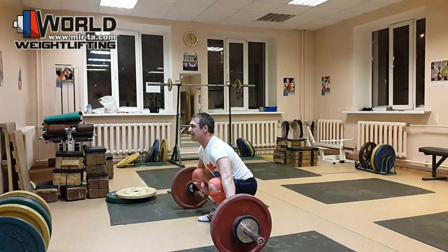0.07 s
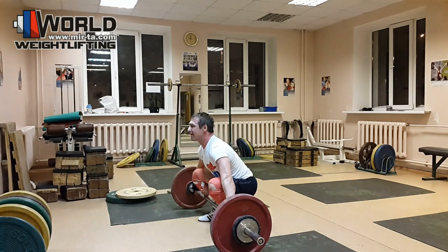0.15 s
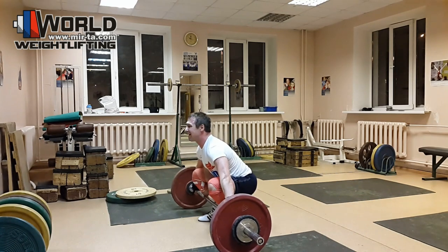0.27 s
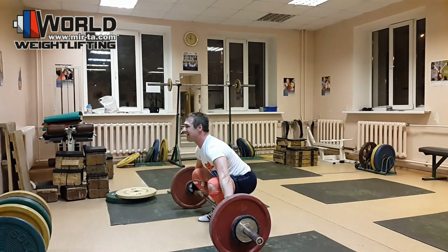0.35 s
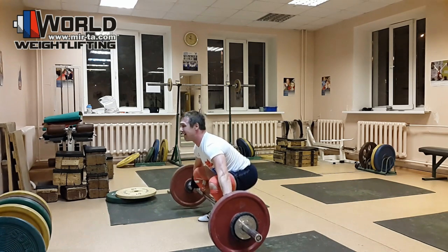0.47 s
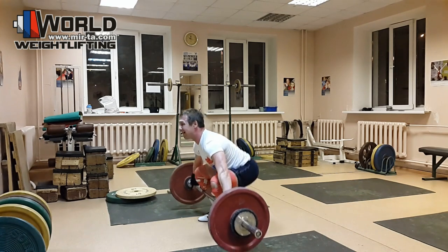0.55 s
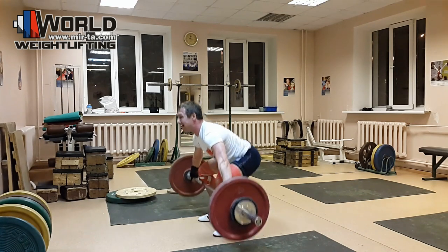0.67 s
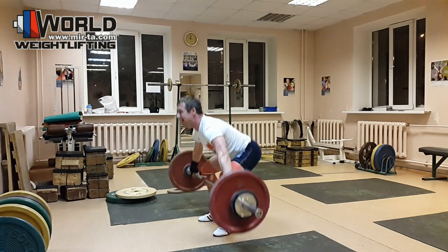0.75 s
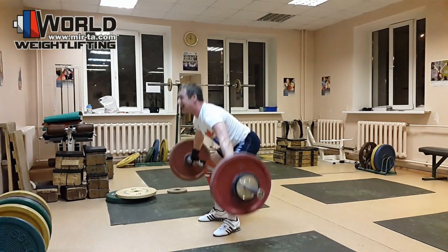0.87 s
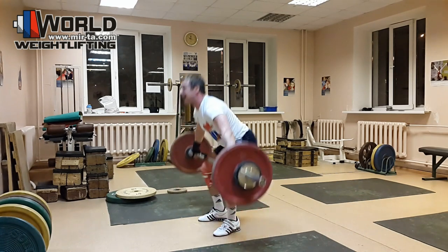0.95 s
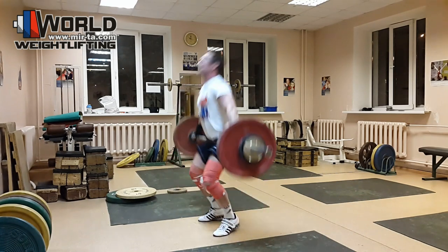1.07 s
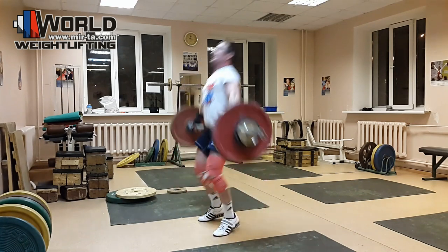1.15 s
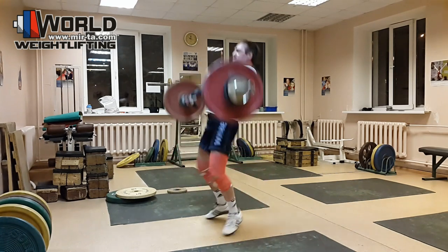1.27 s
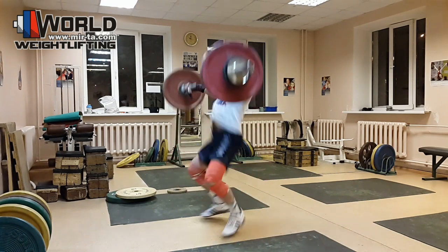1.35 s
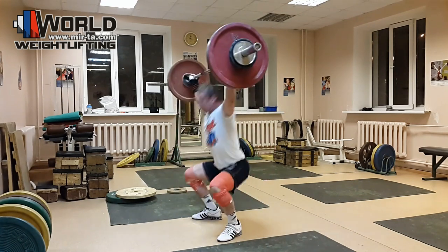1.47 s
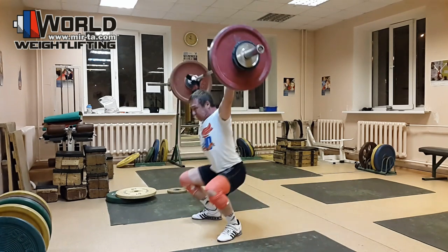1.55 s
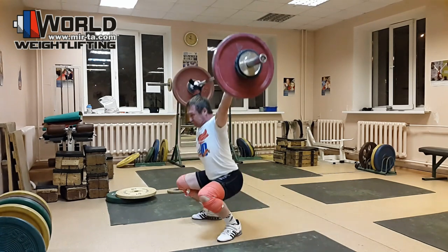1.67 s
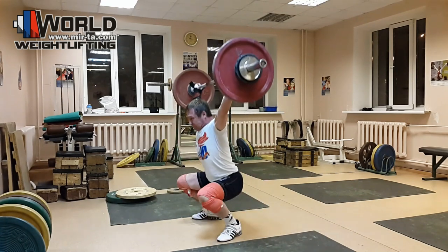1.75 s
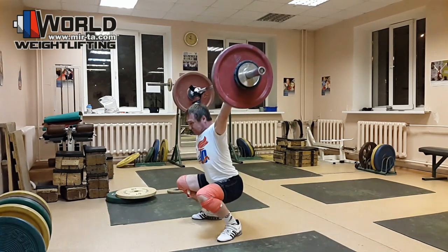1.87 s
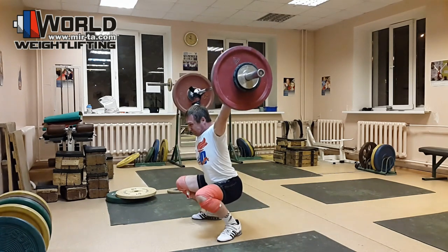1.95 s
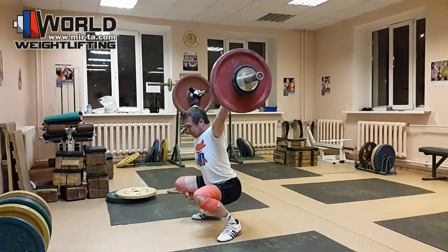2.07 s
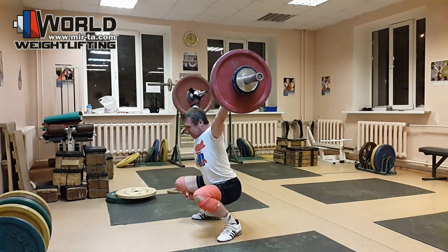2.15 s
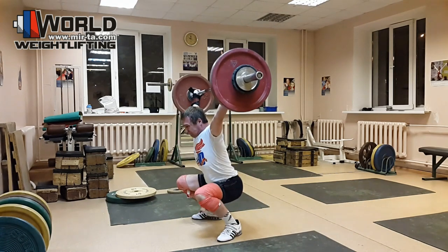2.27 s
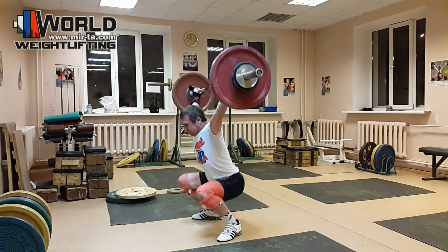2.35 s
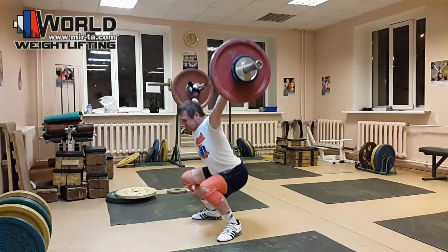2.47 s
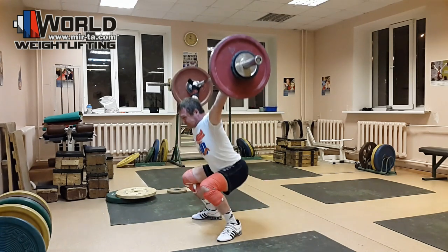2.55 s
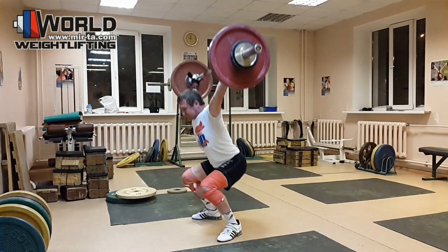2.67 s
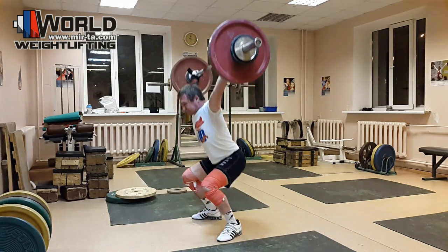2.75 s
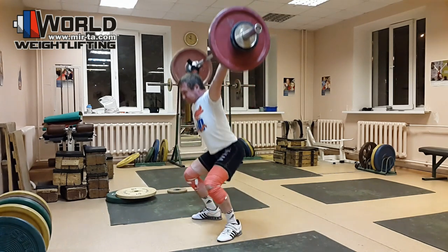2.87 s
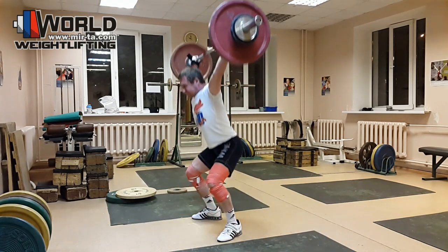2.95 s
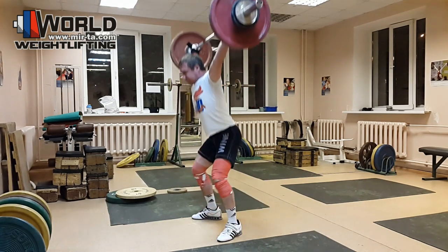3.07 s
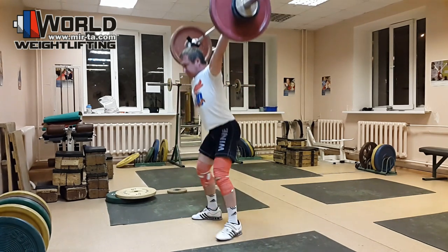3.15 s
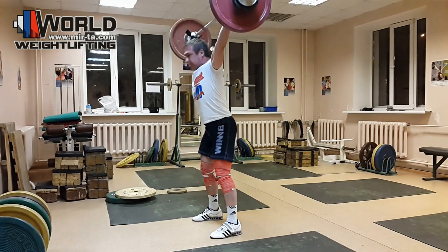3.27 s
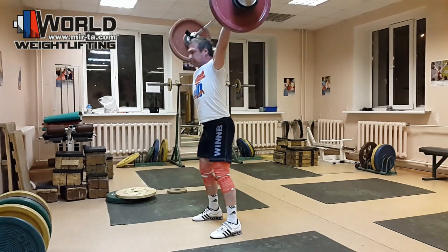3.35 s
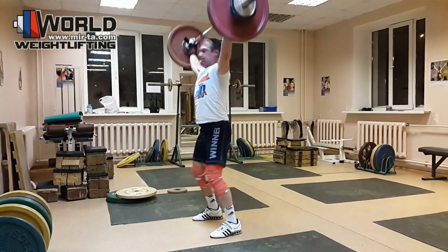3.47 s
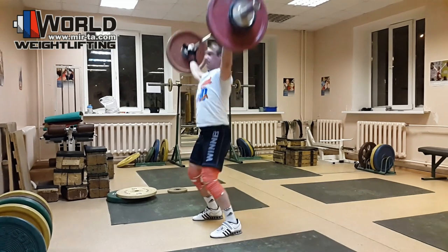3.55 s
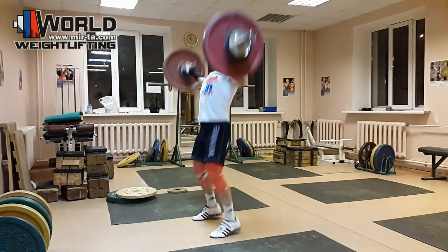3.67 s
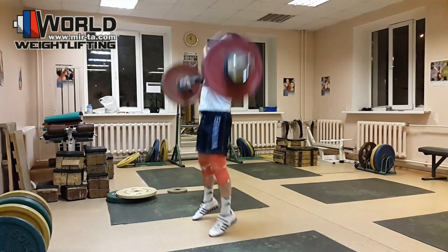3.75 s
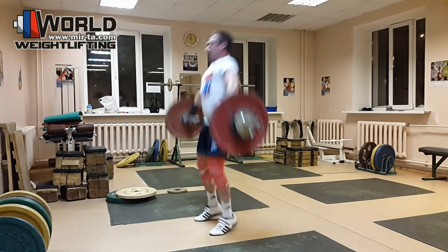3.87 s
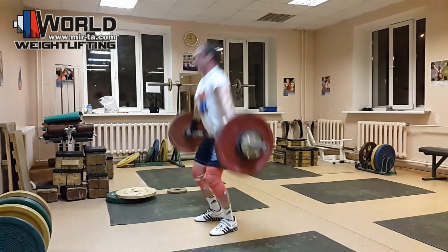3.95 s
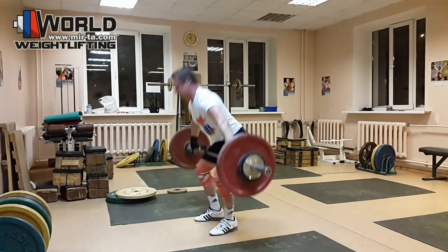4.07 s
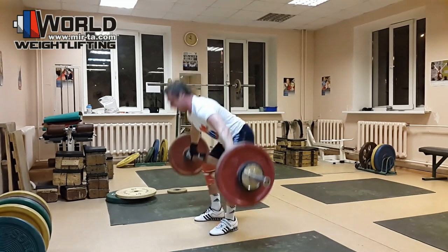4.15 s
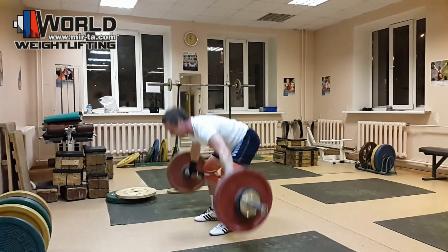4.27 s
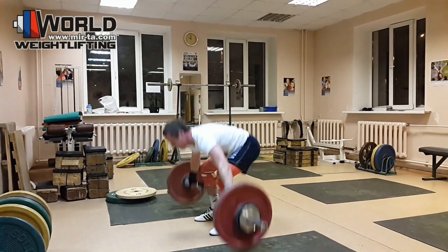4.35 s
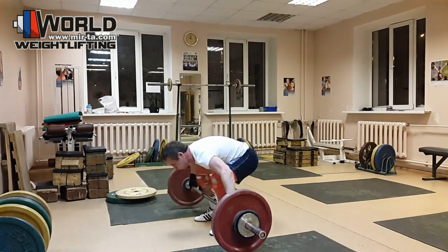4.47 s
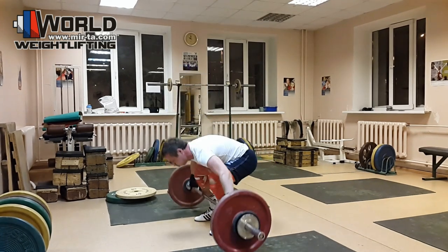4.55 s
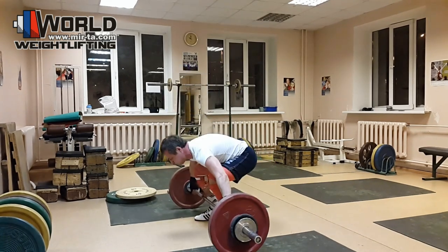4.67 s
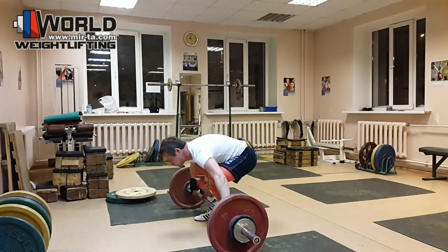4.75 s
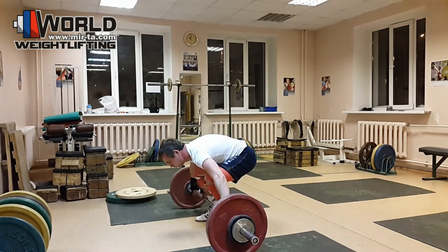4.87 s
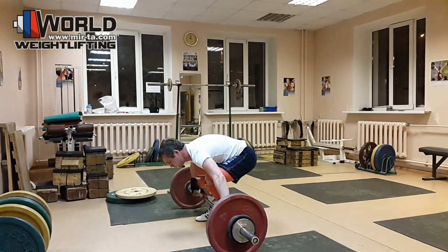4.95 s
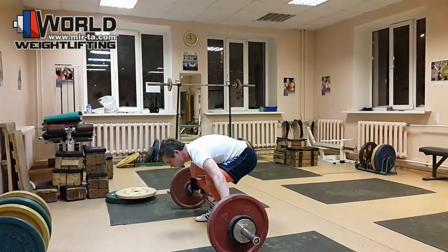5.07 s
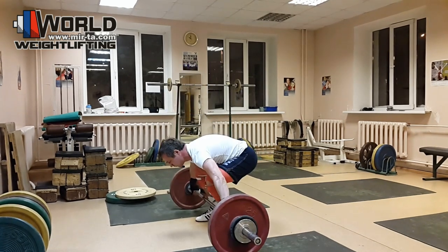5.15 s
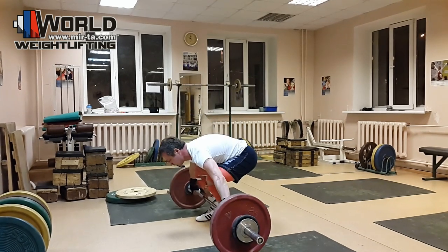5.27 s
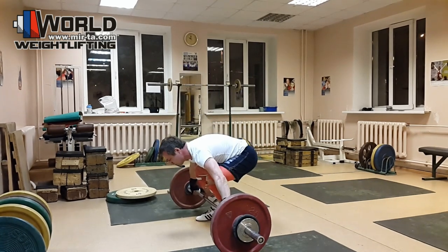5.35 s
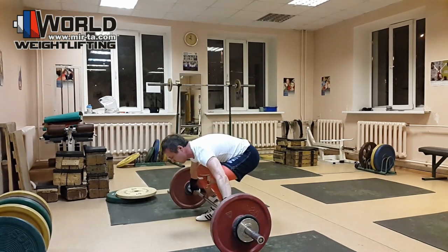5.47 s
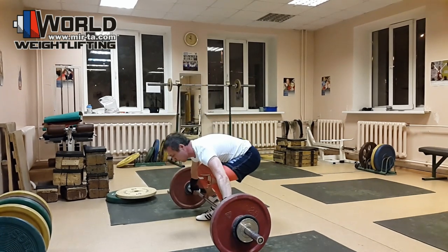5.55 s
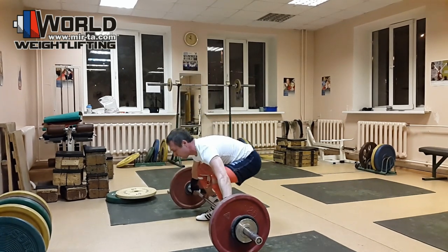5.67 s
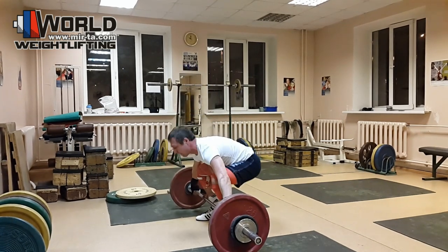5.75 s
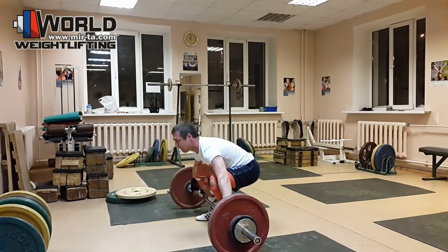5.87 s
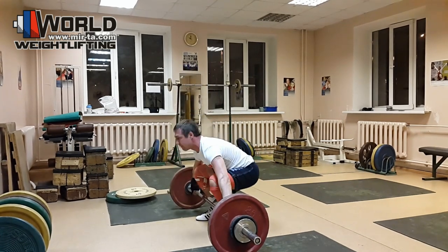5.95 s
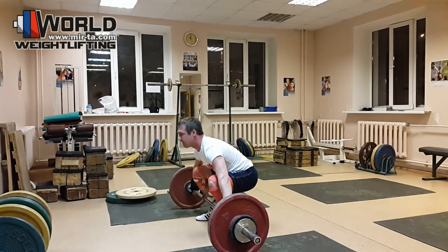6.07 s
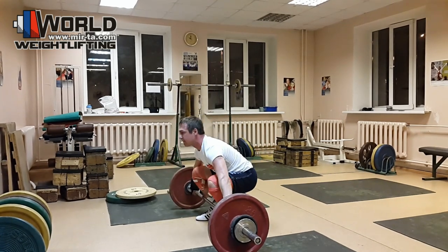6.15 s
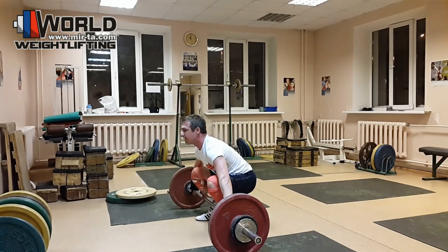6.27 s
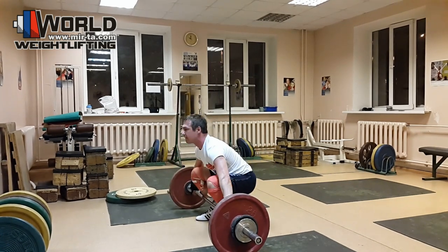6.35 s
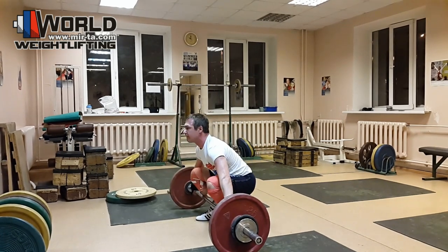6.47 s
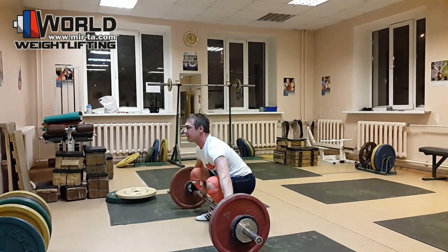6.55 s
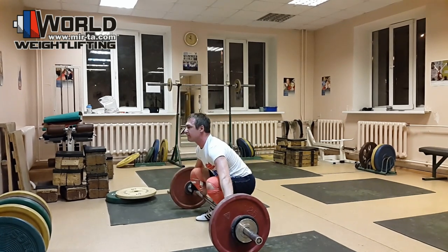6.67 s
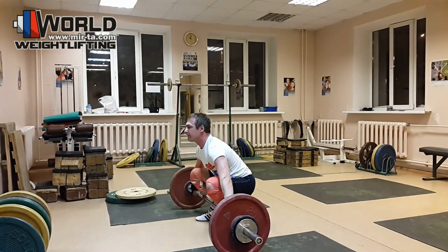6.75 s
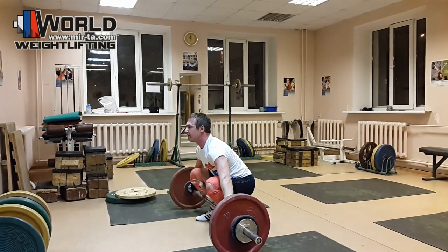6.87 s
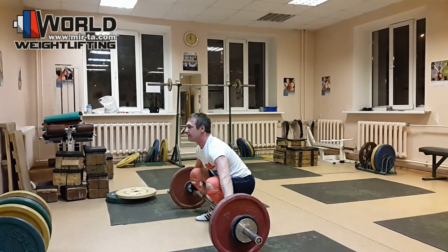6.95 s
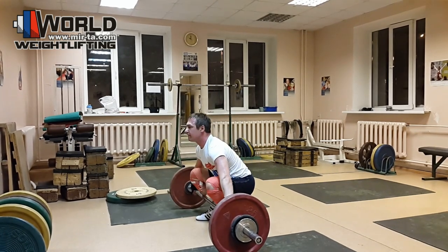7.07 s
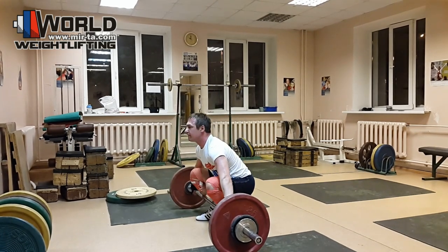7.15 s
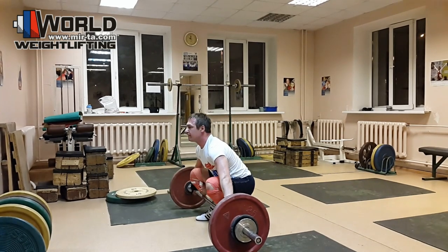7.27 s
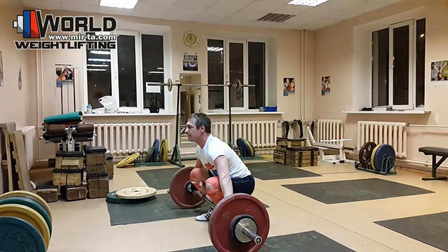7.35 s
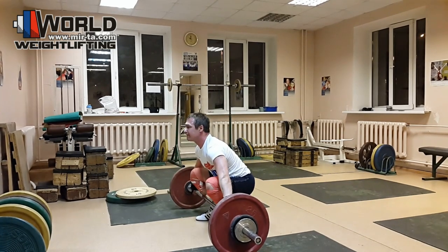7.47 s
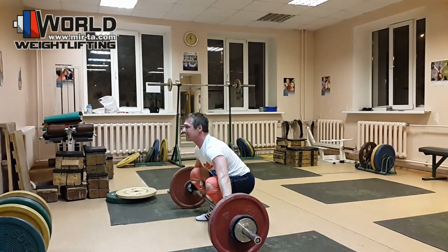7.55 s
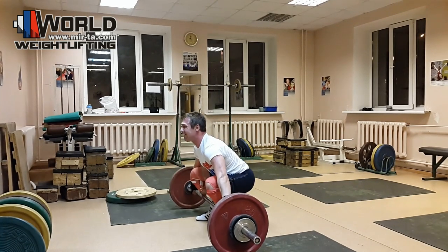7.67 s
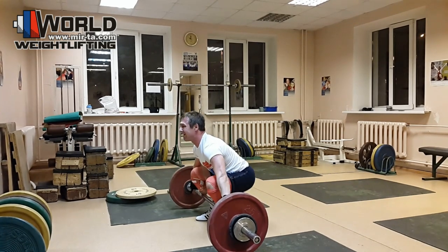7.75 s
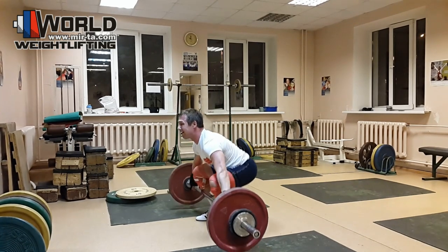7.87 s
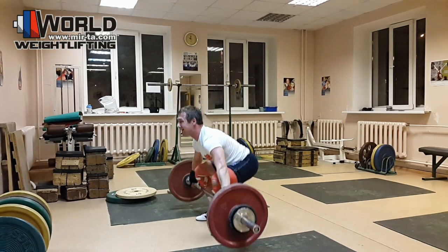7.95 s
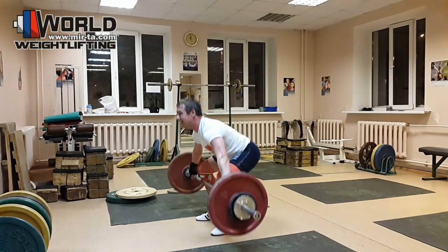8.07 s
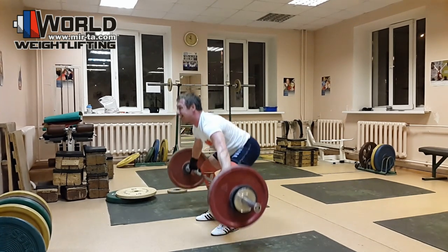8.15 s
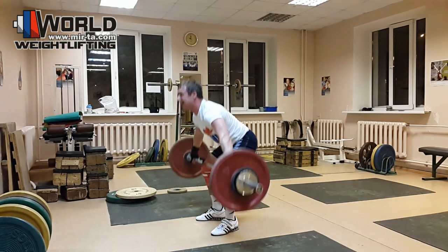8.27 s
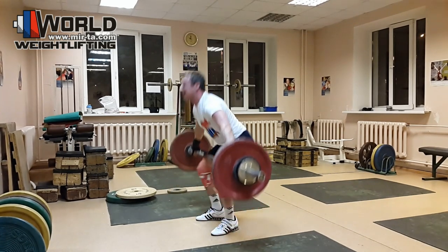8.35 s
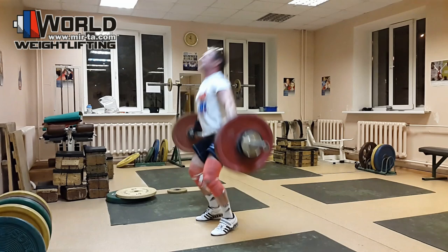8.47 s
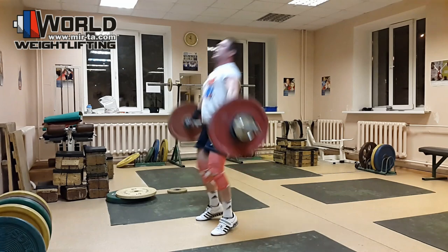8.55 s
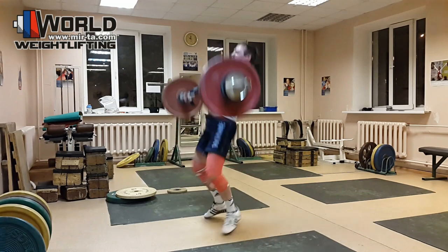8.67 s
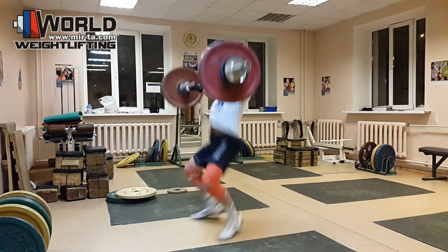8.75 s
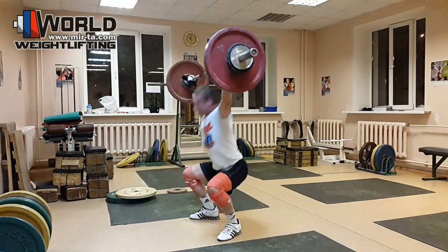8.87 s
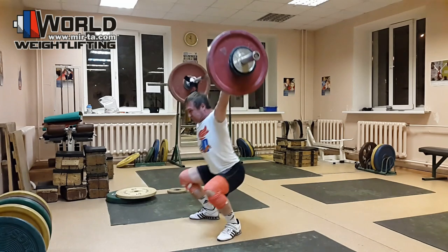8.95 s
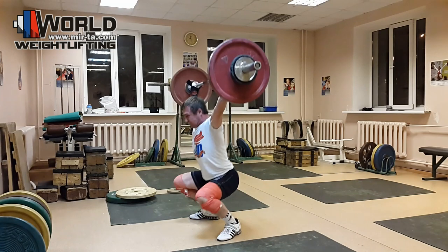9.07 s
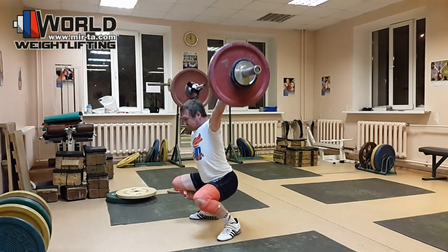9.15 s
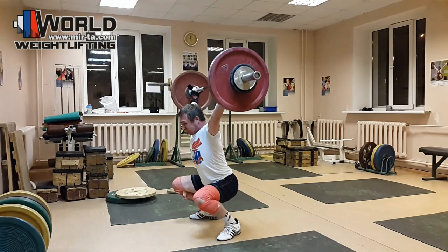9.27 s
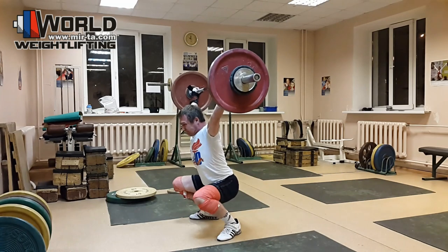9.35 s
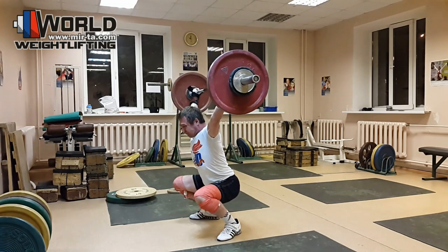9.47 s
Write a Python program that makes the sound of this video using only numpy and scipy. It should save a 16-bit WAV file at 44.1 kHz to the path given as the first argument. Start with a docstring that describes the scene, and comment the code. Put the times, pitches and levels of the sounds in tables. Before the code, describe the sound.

In a hard-walled gym, loose plates clatter as a barbell is snatched, feet slam the floor, the bar crashes down, then it repeats.

```python
"""A hard-walled gym: a lifter snatches a loaded barbell, lowers it to the platform and snatches again.
Loose plates clatter on steel sleeves: impulses excite short hub modes, and long decaying tones ring in the steel.
Shoes and rubber rims thud on the wooden floor as damped tones and filtered noise; its low modes boom and beat.
The contacts excite a diffuse tail, over a low rumble and a narrow band of microphone hiss of shaped noise."""
import sys
import numpy as np
from scipy import signal
from scipy.fft import rfft, irfft
from scipy.io import wavfile
from scipy.ndimage import uniform_filter1d

SR = 44100
rng = np.random.default_rng(int(sys.argv[2]) if len(sys.argv) > 2 else 0)


def to_wav(s):
    """Save 16-bit WAV."""
    ch = np.atleast_2d(s).T  # columns
    pcm = np.round(np.clip(ch, -1, 1) * 32767)  # PCM
    wavfile.write(sys.argv[1], SR, pcm.astype(np.int16))


N = 419391  # samples

# Rumble spectrum. Each row: frequency in Hz, relative spectral level in dB.
RUMBLE_SPECTRUM = [(15, -59.5), (25, -27), (64, -15), (98, -6.5), (124, -13), (345, -22), (413, -19),
                   (525, -28.5), (1320, -37.5), (1710, -35.5), (3000, -51.5), (3900, -83), (6600, -120)]
# Microphone hiss spectrum. Each row: frequency in Hz, relative spectral level in dB.
HISS_SPECTRUM = [(1880, -58.5), (3200, -27.5), (3710, -14), (3940, -2.5), (4130, 2.5), (5370, -12),
                 (6270, -32.5), (10900, -32), (14000, -33), (15200, -23), (16000, -27.5)]
# Movement of the lifter that stirs the rumble. Each row: time in seconds, added level in dB.
STIR = [(0, 0.5), (0.598, 9.5), (1.1, 5.5), (3.101, 6), (3.45, 9.5), (3.799, 10), (5.6, 12), (6.3, 1),
        (7.4, -1), (7.999, 4), (8.5, 4.5), (9.51, 8.5)]
# Balance of the background noise. Each row: frequency in Hz, left over right in dB.
NOISE_LEAN = [(60, -4.5), (180, 1), (550, -6), (1650, 1), (4970, -23.5), (15000, 11)]
# Floor and room modes. Each row: frequency in Hz, relative level in dB, decay time T60 in seconds.
BOOM_MODES = [(31.2, -9, .8), (45.7, 0, 1.75), (54.7, -6, 1.9), (64.9, -3, 1.8), (73.4, -5, .75),
              (86, -7, 1.0), (95.3, -7, 1.1), (110, -9, .9)]
# Full weight landing on the boards. Each row: time in seconds, boom excitation in dB.
LANDINGS = [(0.638, -66), (1.568, -15), (3.43, -55), (4.029, -42), (4.128, -35.5), (4.572, -31),
            (4.782, -35), (5.583, -62.5), (7.904, -70), (8.062, -67.5), (8.663, -61), (8.975, -13.5)]
# Shoes and rubber rims on the floor.
# Each row: start in seconds, thud level in dB, pitch in Hz, level of the boards' shudder in dB.
THUDS = [(0.263, -45, 440, -77.5), (0.609, -73.5, 233, -48), (1.17, -53, 156, -53.5),
         (1.201, -47, 342, -47.5), (1.238, -43.5, 358, -45), (1.284, -20.5, 455, -49),
         (1.455, -22, 458, -42), (1.568, -6, 453, -18), (1.594, -9, 343, -21), (1.619, -14.5, 133, -21),
         (1.658, -30.5, 92, -14.5), (3.429, -48, 93, -52.5), (3.857, -32.5, 426, -61),
         (3.985, -34, 482, -43.5), (4.03, -34.5, 420, -45.5), (4.126, -33, 150, -29),
         (4.225, -15.5, 412, -50), (4.572, -17.5, 345, -32), (4.629, -22, 450, -28),
         (4.778, -24, 222, -38.5), (5.149, -41.5, 171, -38.5), (5.585, -47, 141.1, -56),
         (7.618, -55.5, 356.4, -70), (7.904, -44, 358, -59), (8.06, -45, 333.4, -44.5),
         (8.429, -53.5, 149, -61.5), (8.577, -48.5, 195.5, -51.5), (8.62, -36.5, 443, -56.5),
         (8.662, -17.5, 455, -60.5), (8.714, -30, 414, -53.5), (8.862, -22.5, 450, -52),
         (8.948, -9.5, 376, -7), (8.98, -23.5, 148, -12), (9.029, -31.5, 283, -14.5), (9.07, -48, 92, -20),
         (9.14, -40, 137, -28)]
# Reverberation of the room. Each row: band centre in Hz, decay time T60 in seconds.
ROOM_DECAY = [(80, 0.11), (200, 0.86), (500, 0.74), (1200, 0.72), (3000, 0.73), (7000, 0.74), (14000, 0.56)]
# Left-right likeness of the diffuse tail. Each row: frequency in Hz, likeness from 0 to 1.
TAIL_LIKENESS = [(60, 0.92), (180, 0.95), (550, 0.77), (1650, 0.3), (4970, 0.1), (15000, .1)]
# Balance of the bar and plates. Each row: frequency in Hz, left over right in dB.
BAR_LEAN = [(60, 2), (150, 0.5), (380, -5.5), (950, -12.5), (2380, -7.5), (5980, -12.5), (9000, 4),
            (15000, 1.5)]
# Jolts that shake the plates loose on the sleeves.
# Each row: start in seconds, length in seconds, shake level at the start in dB, shake level at the end in dB.
JOLTS = [(1.163, 0.096, -63.5, -54.5), (1.283, 0.13, -27, -16), (1.559, 0.13, -22, -23),
         (3.314, 0.088, -78.5, -62), (3.416, 0.28, -63, -75), (3.873, 0.19, -30, -45.5),
         (4.13, 0.087, -37, -36.5), (4.222, .17, -38, -43), (4.564, 0.1, -21, -15),
         (4.776, .14, -17.5, -17.5), (8.569, 0.071, -62, -48.5), (8.665, .13, -21, -17.5),
         (8.825, .07, -18, -23.5), (8.949, 0.13, -29, -24.5)]
# The whole stack slapping together as the bar stops short. Each row: time in seconds, shake level in dB.
SLAPS = [(1.567, -7.5), (4.128, -33), (4.228, -29), (8.948, -6)]
# Spectrum of the plates' contact noise. Each row: frequency in Hz, relative spectral level in dB.
CLATTER_SPECTRUM = [(88, -47.5), (150, -17), (475, -5), (1420, 0.5), (2060, -5), (2400, -1), (3840, -7.5),
                    (4160, -11), (4410, -4), (5910, -18.5), (9080, -76.5), (9630, -25), (10800, -55.5),
                    (12400, -28), (16000, -38.5)]
# Short modes of the plate hubs. Each row: frequency in Hz, relative level in dB, decay time T60 in seconds.
HUB_MODES = [(455, -2, 0.033), (760, -13, 0.024), (993, -7.5, 0.015), (1310, -0.5, 0.017), (1550, -4, 0.03),
             (1860.5, 0, 0.034), (2060, 0.5, 0.031), (2243, -4, 0.036), (3004, -11.5, 0.029),
             (3350, -16, 0.064), (4670, -16, 0.017)]
# Ringing tones of bar and sleeves, one list a family, upward in pitch;
# in the last list also clusters of high shimmer.
# Each row: frequency in Hz, relative level in dB, decay time T60 in seconds.
STEEL_FAMILIES = [
    [(1753, -8, 1.4), (1761, -3, 1.8), (1773, -12.5, 1.8)],
    [(2980, -6, 0.15), (3093, -6.5, .2)],
    [(4072, 4.5, 0.22), (4190, -10, 0.16)],
    [(5780, 0, 0.9), (6916, -9, 0.51), (7540, -24.5, 0.13), (7840, -25.5, .2)],
    [(9760, -3, 0.25), (9900, 2, 0.16), (10410, -13.5, 0.72), (11480, -14.5, 0.63), (13200, -10, 0.17),
     (13000, -8, .2), (12200, -9.5, .15), (14010, -3.5, .2), (14830, 0.5, .27), (14930, -2, .15),
     (15120, 0.5, .2), (15400, -2.5, .15)],
]
# Offset of each steel family's ring. Each entry: added level in dB.
FAMILY_DB = [0.21, 2.8, 2, -1.1, -1.7]
# The hands tighten on the bar and still its ring. Each entry: time in seconds.
GRIPS = [2.37, 6.04]
# Plate and sleeve knocks, and moments when the steel's ring swells or sinks to a new level.
# Each row: start in seconds, knock level in dB, pitch in Hz,
# base level of the steel's ring in dB, dullness in dB lost a family upward,
# place of the emphasis (0 bar, 1 collar, 2 sleeve, 3 sleeve end).
KNOCKS = [(0.265, -50, 2110, -74.5, 7, 2.1), (0.992, -62, 3950, -90, 4, 3.4),
          (1.249, -42, 2130, -51, 8.3, 0.78), (1.284, -18.5, 647, -26, 13, 1.5),
          (1.31, -18, 2250, -36, 6.3, 1.4), (1.342, -14.5, 1827, -30, 3.4, .1),
          (1.364, -19, 2130, -36.5, 3.5, 2.4), (1.393, -14, 1550, -29.5, 3.9, .1),
          (1.409, -29, 2080, -34, 5.1, 2.24), (1.459, -25.5, 2060, -48, 2.2, 1.1),
          (1.499, -30.5, 2190, -42.5, 4.3, .1), (1.54, -21.5, 2080, -48, 5.6, 1.1),
          (1.57, -11, 610, -33, 12, 1.1), (1.591, -12, 590, -54, 6, .9), (1.654, -28, 646, -36, 3.4, 2.46),
          (1.749, -22.5, 1756, -39, 9.3, 1.6), (1.984, -37.5, 1550, -64, 9.5, .1),
          (2.2, -58.5, 1743, -69, 13, 0.11), (3.378, -60, 1050, -90, 4, 0.57),
          (3.433, -54, 603, -90, 3.7, 1.6), (3.497, -59, 1496, -90, 4, 0.57),
          (3.868, -28.5, 1076, -39, 11.5, 1.7), (3.888, -25, 1460, -46, 9.9, 1.8),
          (4.036, -25, 670, -55, 12, 1.9), (4.128, -13.5, 2150, -33, 6.4, 2.6),
          (4.151, -25.5, 2050, -40, 3.7, 1.8), (4.226, -16, 757, -42, 5.3, 3.34),
          (4.289, -22, 575, -40, 9.8, 2.2), (4.333, -24.5, 896, -40.5, 10.5, 2.4),
          (4.573, -16.5, 1710, -27, 6.7, 2.1), (4.582, -8, 2310, -38, 4.5, 1.1),
          (4.609, -10, 1334, -30.5, 2.9, 1.1), (4.645, -9, 2060, -23, 4.2, 1.27),
          (4.666, -7, 1817, -29, 3, .1), (4.698, -14.5, 2060, -32.5, 1.5, 1.5),
          (4.73, -14, 1740, -31, 0.46, 1.4), (4.784, -13.5, 1930, -28, 2.6, 1),
          (4.834, -13.5, 2060, -33, 0.72, 1.75), (4.859, -13.5, 1980, -32, 2.1, 1.1),
          (4.895, -16, 1310, -32.5, 1.4, 1.3), (4.939, -22.5, 2060, -38.5, 1.85, 3.04),
          (4.988, -21, 1730, -44, 1.5, 3.4), (5.119, -48, 1800, -53.5, 7.7, 0.11),
          (5.246, -57.5, 1766, -52.5, 11, 0.12), (5.951, -60.5, 1760, -71.5, 12, .1),
          (8.064, -59.5, 708, -88, 3.3, 2), (8.626, -32, 700, -65, 10, 2),
          (8.665, -14.5, 674, -38, 7.1, .8), (8.698, -17.5, 1980, -30, 4.5, 1.75),
          (8.717, -17.5, 1940, -33.5, 3.4, 1), (8.751, -17, 1700, -32, 3.1, 1.8),
          (8.779, -10.5, 1850, -30, 0.66, 1.25), (8.802, -22, 1520, -30, 0.29, 1.65),
          (8.837, -27, 1830, -37.5, 0.27, 0.11), (8.868, -17, 1690, -29.5, 2, 0.79),
          (8.898, -25, 1820, -38, 2.7, 0.63), (8.948, -9.5, 720, -38, 12, 1.5),
          (9.068, -19.5, 1760, -33.5, 7.5, 0.86), (9.169, -27.5, 1920, -42, 6.6, 0.85),
          (9.293, -32.5, 1770, -49, 5.6, 1.5), (9.471, -39, 576, -57.5, 5.1, 2.4)]

RUMBLE_DB, HISS_DB = -74, -70.5
BUILD_T60 = 0.14  # s, how fast the room fills with the boom
FLOOR_WET_DB = .5  # diffuse tail against direct sound for the blows on the floor
FEET_LAG = 15  # samples by which the left port hears the floor late
SLAP_S, SETTLE_DB_PER_S = 0.009, 217.5  # length of a slap; how fast the plates come to rest after a jolt
REBOUND_DB, REBOUND_S = -8.5, .011  # every row of KNOCKS adds a brief, dying rattle of the plates
TICKS_PER_S, GRIT_S = 700, 0.0039  # mean rate of ticks; decay constant of one tick's scrape
NEAR_DB, REACH = 9, 0.59  # the family at the given place rings louder; reach in families
GRIP_DB_PER_S = 92  # extra decay of the gripped bar
SOFT_HZ = 1000  # a row below this pitch sets the ring's level without turning its phase
KNOCK_SIDE_DB, KNOCK_SCATTER_DB = 1, 4.5  # mean left-right lean of the knocks and its spread
EDGE_HZ = 15900  # cutoff of the band limit


def amp(db):
    """A level in decibels is twenty times the logarithm of an amplitude ratio."""
    return 10 ** (np.asarray(db) / 20)


def evened(x):
    """Division by the root mean square gives a signal unit power."""
    return x / np.sqrt(np.mean(x ** 2) + 1e-20)


def read(points, hz):
    """A spectrum given at points is interpolated along logarithmic frequency."""
    f, value = np.transpose(points)
    return np.interp(np.log(hz + 1), np.log(f + 1), value)


def add(mix, s, sound):
    """Superposition: sounds add linearly, here from the given second onward."""
    part = mix[..., round(s * SR):][..., :sound.shape[-1]]
    part += sound[..., :part.shape[-1]]


def ring(blows, hz, t60):
    """Modal resonance: a complex pole answers every impulse with an exponentially dying sine."""
    pole = np.exp((2j * np.pi * hz - np.log(1000) / t60) / SR)
    return signal.lfilter([1], [1, -pole], blows).imag


def noise_pair(size, likeness, lean):
    """Partial coherence: mixing shared and independent noise spectra sets the likeness of the two ports."""
    hz = np.fft.rfftfreq(size, 1 / SR)
    a, b, c, d = rng.standard_normal((4, len(hz)))
    shared, separate = a + 1j * b, c + 1j * d
    like = np.clip(read(likeness, hz), 0, 1)
    spectra = np.array([shared, like * shared + np.sqrt(1 - like ** 2) * separate])
    return hz, spectra * amp(np.outer([.5, -.5], read(lean, hz)))


def colour(points):
    """Minimum phase: the Hilbert transform of log gain yields a causal filter, scaled to unit energy."""
    hz = abs(np.fft.fftfreq(4096, 1 / SR))
    log_gain = np.log(amp(np.maximum(read(points, hz), -100)))
    taps = np.fft.ifft(np.exp(np.conj(signal.hilbert(log_gain)))).real[:2048]
    return taps / np.linalg.norm(taps)


def burst(hz, cycles, noisy, crack):
    """Impact excitation: a heavily damped tone mixed with contact noise, scaled to peak 1."""
    turns = hz * np.arange(len(crack)) / SR
    tone = np.sin(2 * np.pi * turns) * np.exp(-turns / cycles) * -np.expm1(-turns / .3)
    blow = (1 - noisy) * tone + noisy * crack
    return blow / abs(blow).max()


def background():
    """Stationary noise shaped in frequency: steady hiss, and a rumble modulated in level by movement."""
    hz, spectra = noise_pair(N, [(50, 0.67), (300, 0.64), (1000, .4), (4000, 0.25)], NOISE_LEAN)
    rumble = irfft(spectra * amp(read(RUMBLE_SPECTRUM, hz)), N)
    hiss = irfft(spectra * amp(read(HISS_SPECTRUM, hz)), N)
    stir_db = np.interp(np.arange(N) / SR, *np.transpose(STIR))
    rumble = amp(RUMBLE_DB + stir_db) * rumble / np.std(rumble.mean(0))
    return rumble + amp(HISS_DB) * hiss / np.std(hiss.mean(0))


def room(x, wet_db):
    """Reverberation: direct sound, then a diffuse tail whose bands decay at their own rates."""
    size = 2 * SR
    hz, spectra = noise_pair(size, TAIL_LIKENESS, [(1, 0.0077), (2, 0.00086)])
    t, tail = np.arange(size) / SR, 0
    for k, (_, t60) in enumerate(ROOM_DECAY):
        # each band is full at its own centre and fades to nothing at its neighbours'
        band = read([(f, float(j == k)) for j, (f, _) in enumerate(ROOM_DECAY)], hz)
        tail = tail + irfft(spectra * band, size) * amp(-60 * t / t60)
    tail *= np.clip((t - .004) / 0.011, 0, 1)  # silent for 4 ms, then rising over 11 ms
    tail /= np.linalg.norm(tail[0])
    return x + amp(wet_db) * signal.fftconvolve(x, tail, axes=1)[:, :N]


def boom():
    """Modal superposition: floor modes start together, build up as the room fills, and beat."""
    weight = np.zeros(N)
    for s, db in LANDINGS:
        weight[round(s * SR)] = amp(db)
    modes = sum(amp(db) * (ring(weight, hz, t60) - ring(weight, hz, BUILD_T60)) for hz, db, t60 in BOOM_MODES)
    return uniform_filter1d(modes, size=150)  # a soft sole: the blow lasts some milliseconds


def thuds():
    """Soft impact: a long contact excites only low frequencies, a dull tone and a shudder of the boards."""
    out = np.zeros(N)
    grit = rng.standard_normal((len(THUDS), 4000)) * np.exp(-np.arange(4000) / (0.016 * SR))
    dull = signal.butter(2, [120, 650], "band", fs=SR)
    deep = signal.butter(2, [70, 320], "band", fs=SR)
    for (s, db, hz, shudder_db), g in zip(THUDS, grit):
        crack = evened(signal.lfilter(*dull, g)) / 5
        shudder = signal.lfilter(*deep, g)
        add(out, s, amp(db) * burst(hz, 2.7, 0.38, crack))
        add(out, s, amp(shudder_db) * shudder / abs(shudder).max())
    return out


def leaned(x):
    """Level difference: the two microphone ports hear the bar unequally, by frequency."""
    hz = np.fft.rfftfreq(N, 1 / SR)
    return irfft(rfft(x) * amp(np.outer([.5, -.5], read(BAR_LEAN, hz))), N)


def shaking():
    """Forced and free motion: each jolt drives the plates for its length, then their shaking decays."""
    t, out = np.arange(N) / SR, np.zeros(N)
    for s, length, start_db, end_db in JOLTS:
        held_db = np.interp(t, [s, s + length], [start_db, end_db])
        settled_db = SETTLE_DB_PER_S * np.maximum(t - s - length, 0)
        out = np.maximum(out, (t >= s) * amp(held_db - settled_db))
    for s, db in SLAPS:
        out = np.maximum(out, amp(db) * (t >= s) * (t < s + SLAP_S))
    for s, db, *_ in KNOCKS:
        add(out, s, amp(db + REBOUND_DB) * np.exp(-t[:SR // 5] / REBOUND_S))
    return uniform_filter1d(out, size=201, origin=100)  # averages only backward in time


def chatter():
    """Random impacts of loose plates: each tick is a gritty click and excites one hub mode."""
    size = amp(3. * np.minimum(rng.exponential(1, N), 2.3))
    struck = rng.random(N) < TICKS_PER_S / SR
    ticks = evened(size * rng.choice([-1, 1], N) * struck) * shaking()
    hub, side = rng.integers(0, len(HUB_MODES), N), rng.random((2, N))
    rings = sum(amp(db) * ring(ticks * (hub == k) * side, hz, t60)
                for k, (hz, db, t60) in enumerate(HUB_MODES))
    scrape = rng.standard_normal((2, 2000)) * np.exp(-np.arange(2000) / (GRIT_S * SR))
    scrape /= np.linalg.norm(scrape[0])
    scrape = signal.fftconvolve(scrape, colour(CLATTER_SPECTRUM)[None], axes=1)
    clicks = signal.oaconvolve(ticks * side, scrape, axes=1)[:, :N]
    return amp(-8) * clicks + amp(-20.5) * rings


def steel():
    """Exponential decay of ringing tones: each row sets a new ring level; hard knocks also restart the phase."""
    s, _, pitch, *_ = np.array(KNOCKS).T
    t = np.arange(N) / SR
    coarse = t[::64]
    last = np.maximum(np.searchsorted(s, coarse) - 1, 0)  # the latest row at each coarse step
    age, out = coarse - s[last], np.zeros((2, N))
    # seconds since the hands tightened, until the next row
    gripped = np.max([(coarse - g) * (s[last] < g) for g in GRIPS], axis=0).clip(0)
    hard = np.maximum.accumulate(np.arange(len(s)) * (pitch > SOFT_HZ))[last]  # latest row above SOFT_HZ
    swell = np.hanning(11) / 5  # the new ring takes over in about 10 ms
    ring_db, dull_db, place = np.array(KNOCKS)[last, 3:].T
    for family, tones in enumerate(STEEL_FAMILIES):
        near_db = NEAR_DB * np.exp(-((family - place) / REACH) ** 2)
        level_db = ring_db - family * dull_db + FAMILY_DB[family] + near_db
        for hz, db, t60 in tones:
            # each row above SOFT_HZ draws another phase and another share
            phase, skew, share = rng.random((len(s), 3))[hard].T
            decay_db = 60 * age / t60 + GRIP_DB_PER_S * gripped
            size = amp(level_db + db + 4.7 * (share - .5) - decay_db) * (age > 0)
            turn = np.exp(2j * np.pi * hz * t)
            # the sleeves spin and sway, so each tone flutters
            sway = rng.standard_normal((2, len(coarse)))
            sway = uniform_filter1d(uniform_filter1d(sway, size=45), size=45)
            flutter = 1 + .22 * (evened(sway[0]) + 1j * evened(sway[1]))
            for port in (0, 1):
                z = size * flutter * np.exp(2j * np.pi * (phase + .4 * port * skew))
                envelope = np.convolve(z, swell)[:len(z)]
                out[port] += (turn * np.interp(t, coarse, envelope)).real
    return out


def knocks():
    """Impact of plate on sleeve: a crack, a damped tone, and the hub modes nearest that tone."""
    out, taps, t = np.zeros((2, N)), colour(CLATTER_SPECTRUM), np.arange(3000) / SR
    grit = rng.standard_normal((len(KNOCKS), 3000)) * np.exp(-t / 0.0031)
    phases = rng.random((len(KNOCKS), len(HUB_MODES)))
    sides = KNOCK_SIDE_DB + KNOCK_SCATTER_DB * rng.standard_normal(len(KNOCKS))
    for (s, db, hz, *_), g, phase, side_db in zip(KNOCKS, grit, phases, sides):
        hubs = 0
        for (f, hub_db, t60), p in zip(HUB_MODES, phase):
            far_db = 17 * abs(np.log2(f / hz))  # 17 dB lost an octave away from the tone
            hubs = hubs + amp(hub_db - far_db - 60 * t / t60) * np.sin(2 * np.pi * (f * t + p))
        hubs = hubs * -np.expm1(-t / 0.000588)
        # a low knock is a soft contact, and its crack is dull
        soft = signal.butter(2, min(1.6 * hz, 7000), fs=SR)
        crack = signal.lfilter(*soft, np.convolve(g, taps)[:3000])
        knock = burst(hz, 0.0039 * hz, 0.538, evened(crack) / 16) + amp(-8) * hubs
        add(out, s, knock * amp(db + np.array([[side_db / 2], [-side_db / 2]])))
    return signal.sosfilt(signal.butter(4, 6500, fs=SR, output="sos"), out)  # the knocks are dull above 6.5 kHz


def scene():
    """Linear superposition of background, floor and barbell at the two microphone ports."""
    blows = thuds()
    feet = room(np.array([blows, blows]), FLOOR_WET_DB) * amp([[-1.5], [1.5]])
    feet = feet + boom() * amp([[-.4], [.4]])
    feet[0] = np.roll(feet[0], FEET_LAG)
    barbell = room(chatter() + knocks(), -4.0) + room(steel(), -9.5)
    return background() + feet + leaned(barbell)


def record(dry):
    """Band limitation: a linear-phase low-pass removes the top."""
    taps = signal.firwin(511, EDGE_HZ, window=("kaiser", 9), fs=SR)
    return signal.oaconvolve(dry, taps[None], "same")


dry = scene()
out = record(dry)
to_wav(out)
```